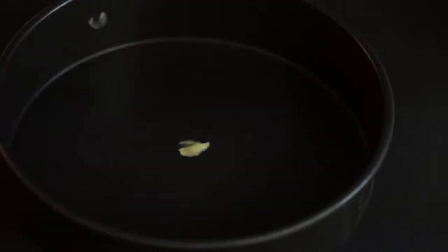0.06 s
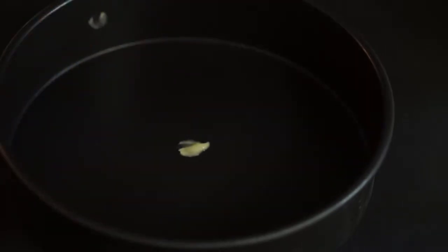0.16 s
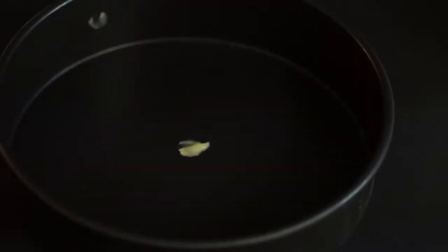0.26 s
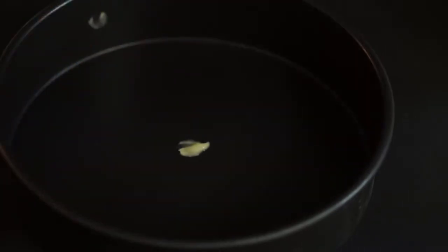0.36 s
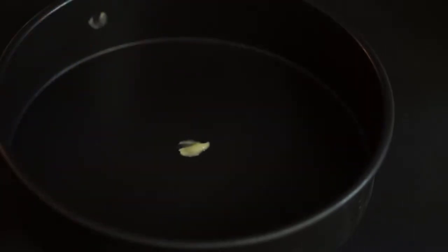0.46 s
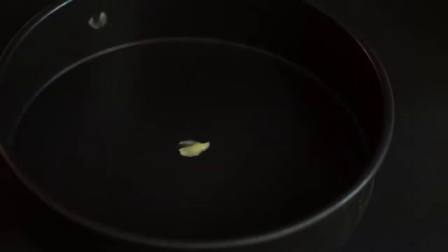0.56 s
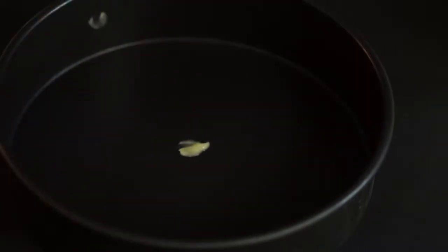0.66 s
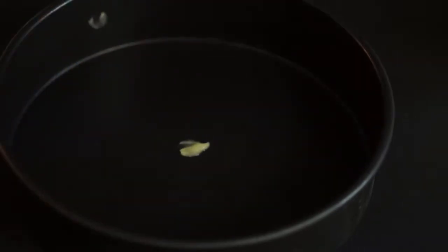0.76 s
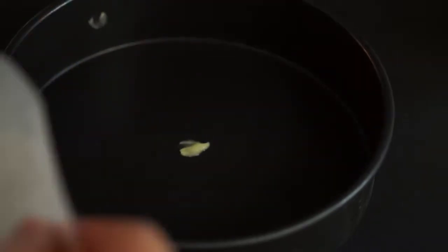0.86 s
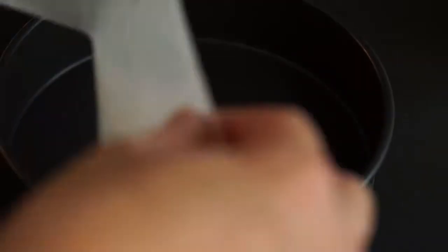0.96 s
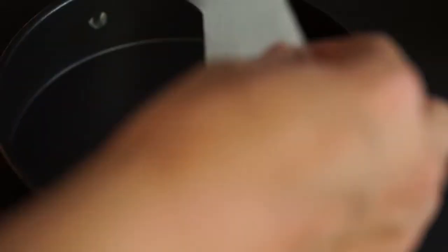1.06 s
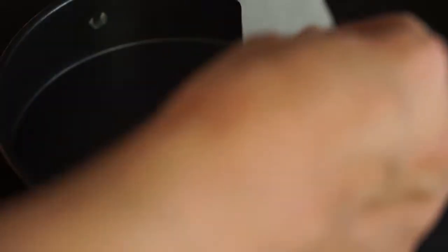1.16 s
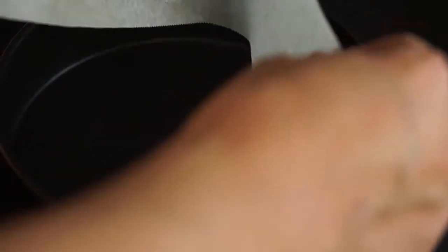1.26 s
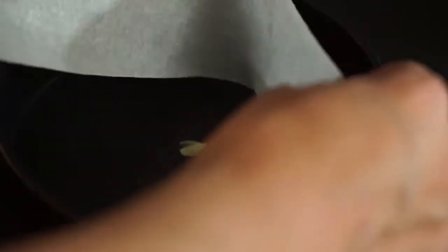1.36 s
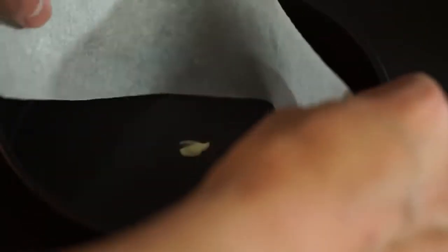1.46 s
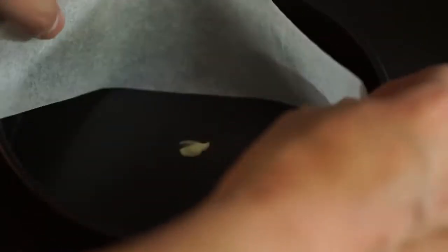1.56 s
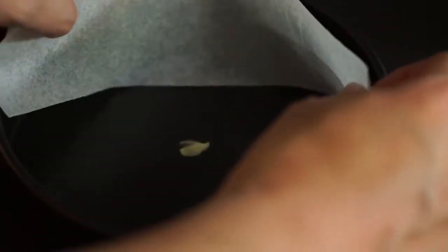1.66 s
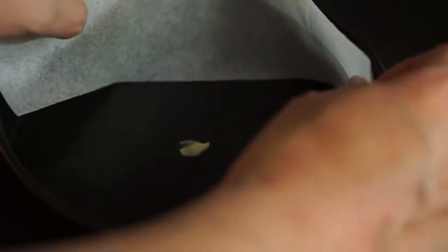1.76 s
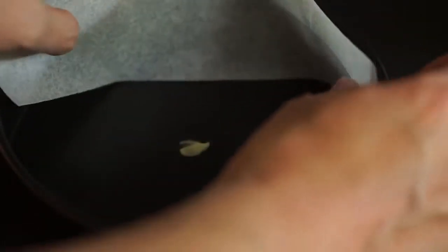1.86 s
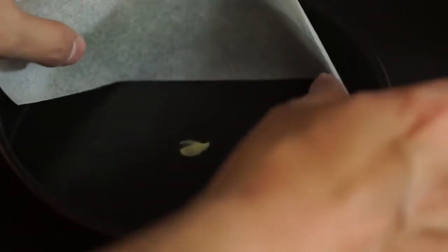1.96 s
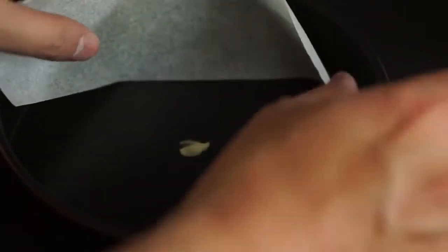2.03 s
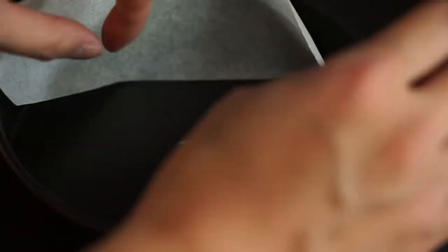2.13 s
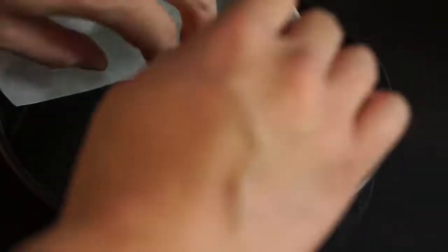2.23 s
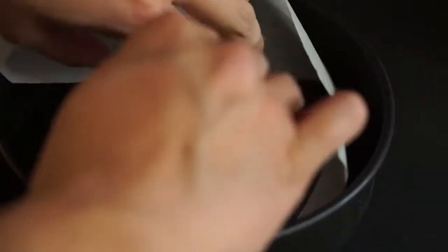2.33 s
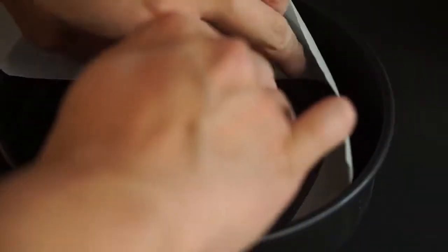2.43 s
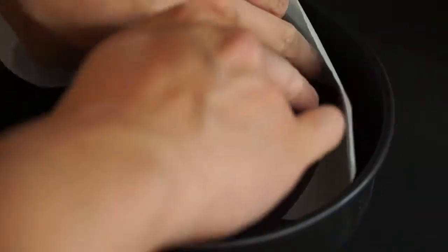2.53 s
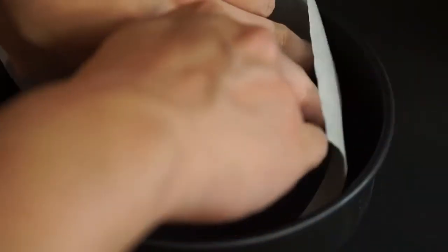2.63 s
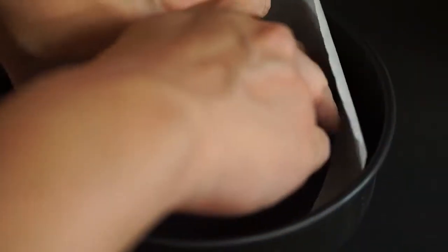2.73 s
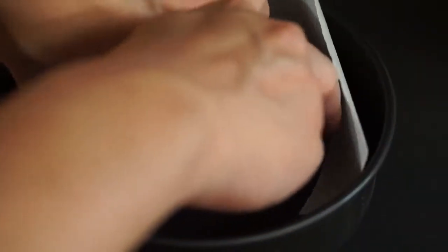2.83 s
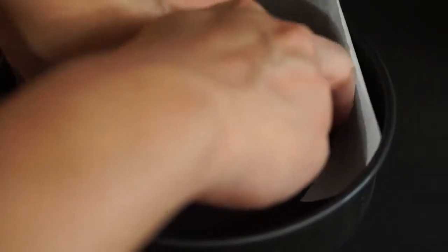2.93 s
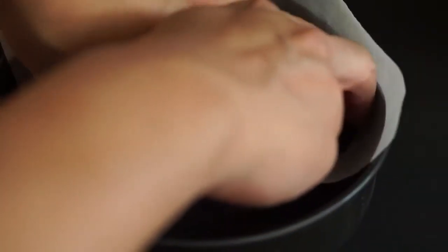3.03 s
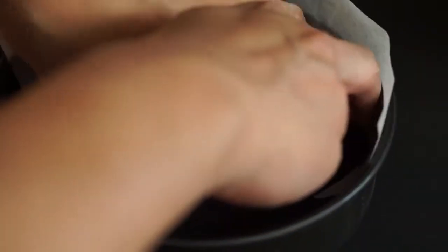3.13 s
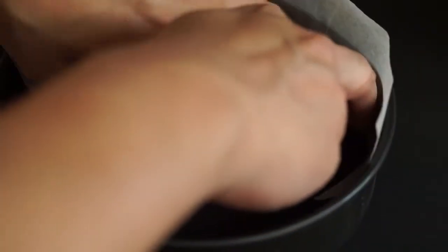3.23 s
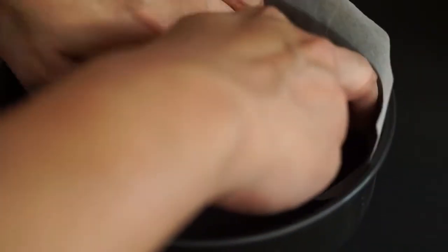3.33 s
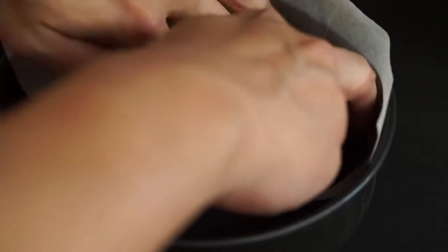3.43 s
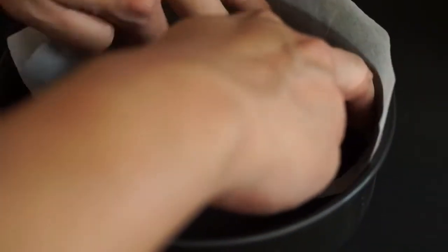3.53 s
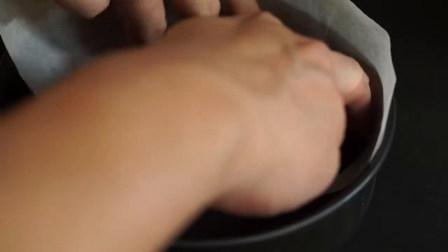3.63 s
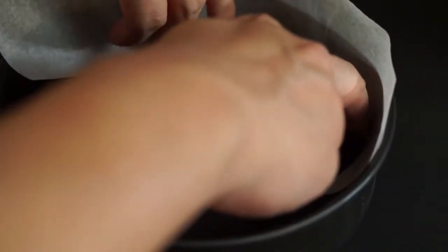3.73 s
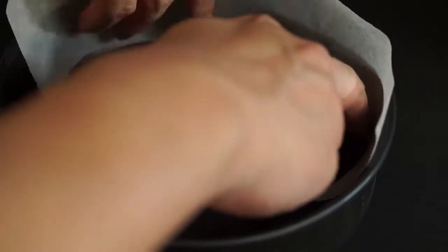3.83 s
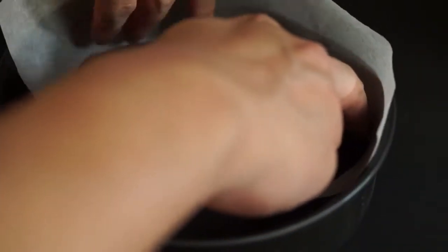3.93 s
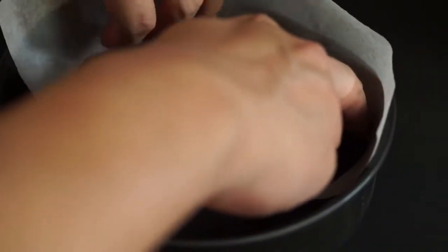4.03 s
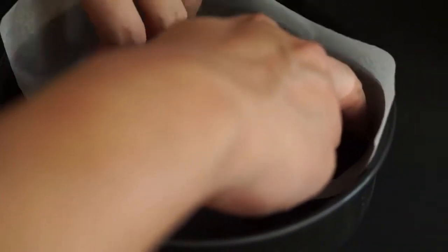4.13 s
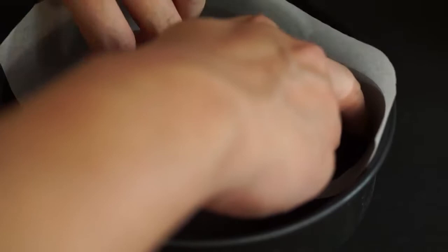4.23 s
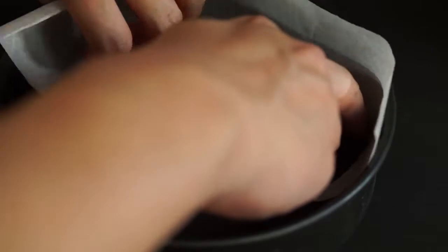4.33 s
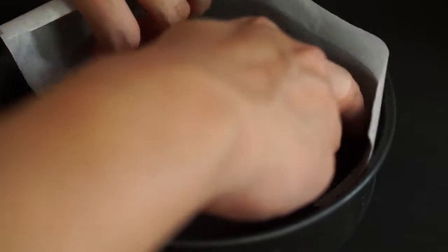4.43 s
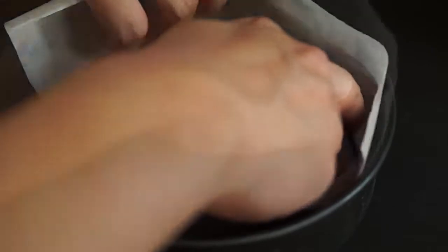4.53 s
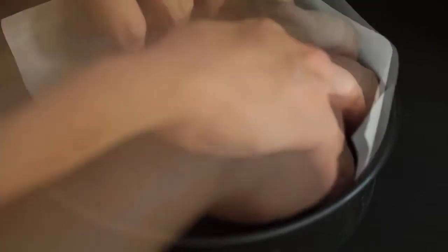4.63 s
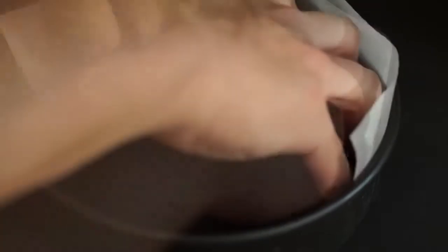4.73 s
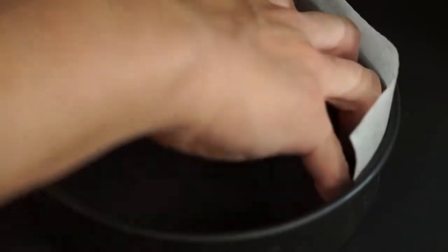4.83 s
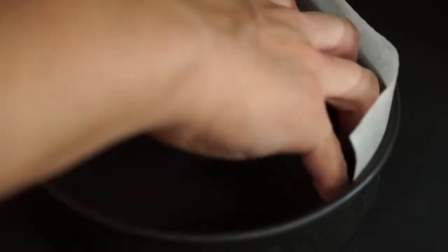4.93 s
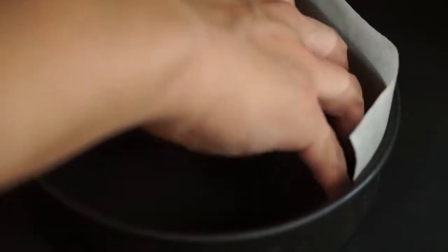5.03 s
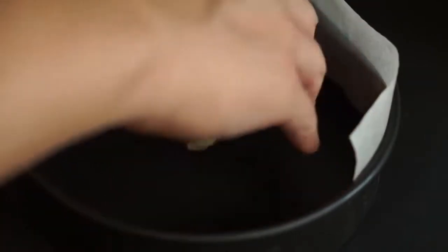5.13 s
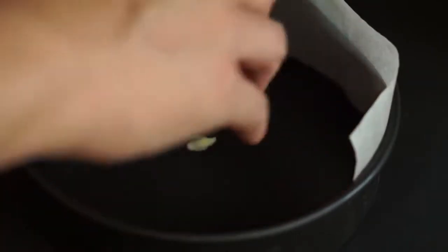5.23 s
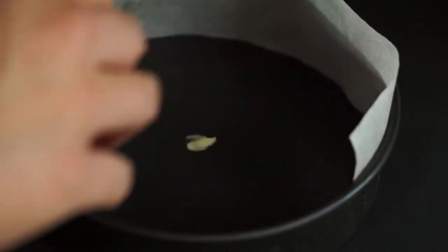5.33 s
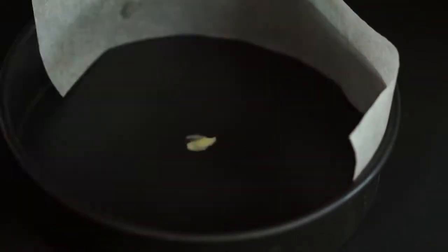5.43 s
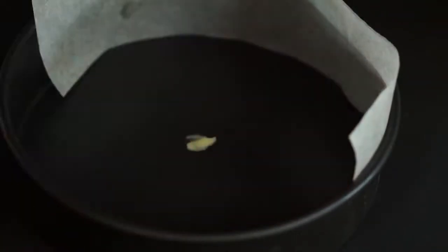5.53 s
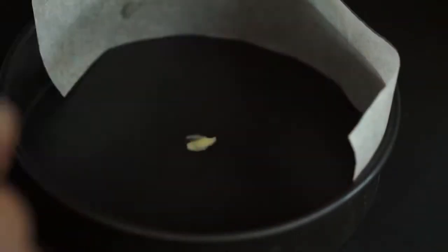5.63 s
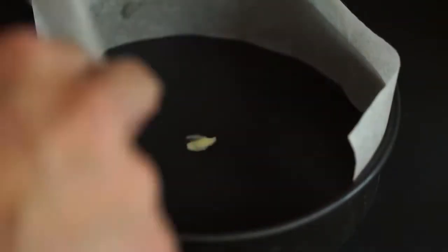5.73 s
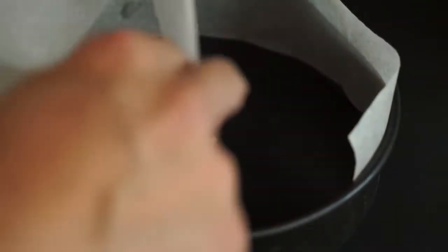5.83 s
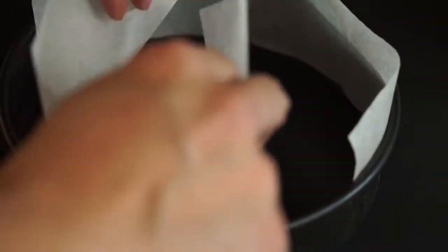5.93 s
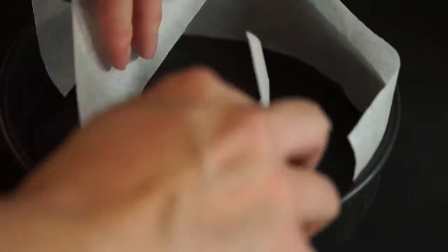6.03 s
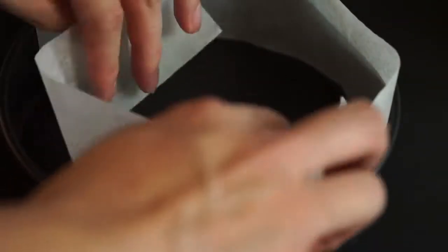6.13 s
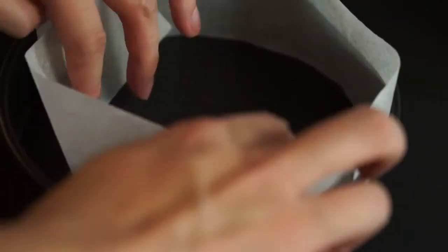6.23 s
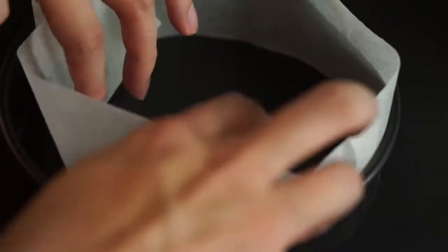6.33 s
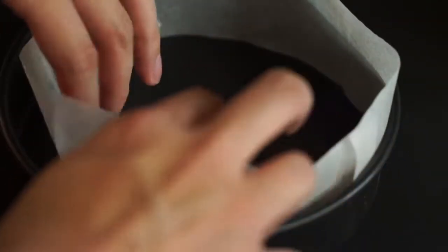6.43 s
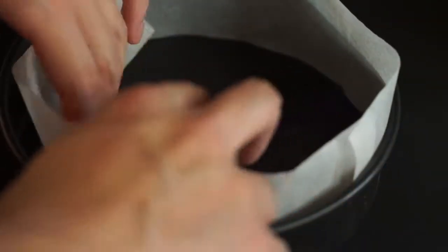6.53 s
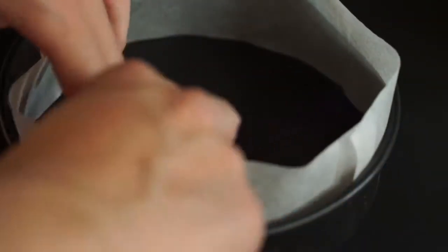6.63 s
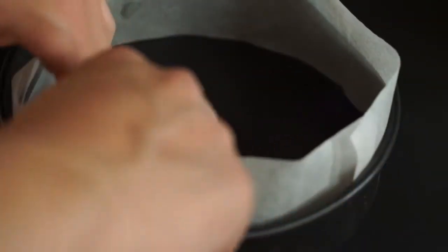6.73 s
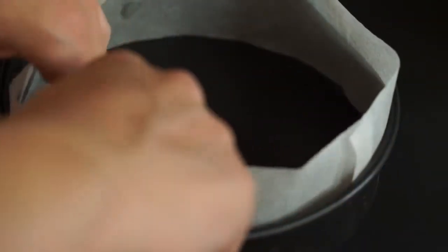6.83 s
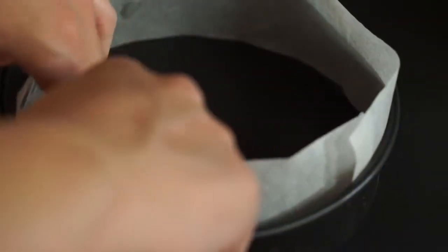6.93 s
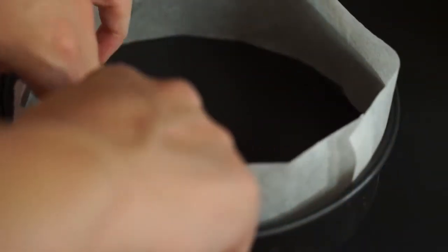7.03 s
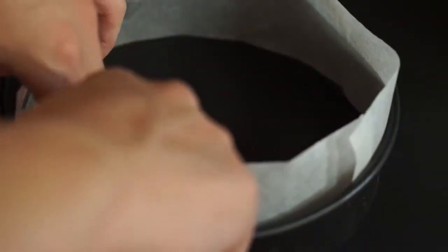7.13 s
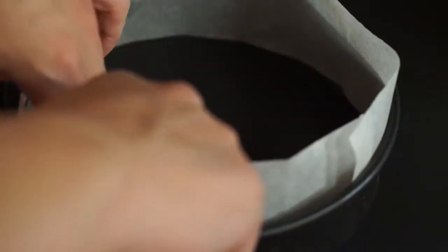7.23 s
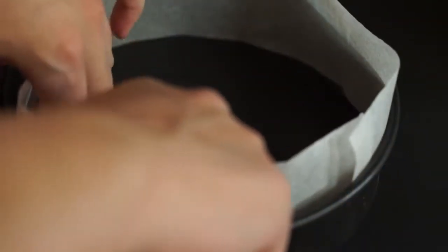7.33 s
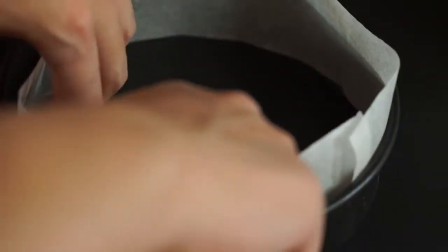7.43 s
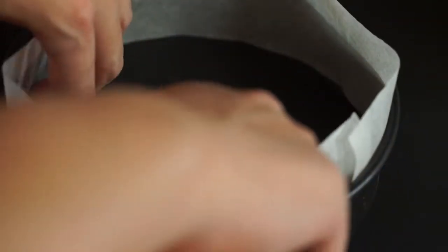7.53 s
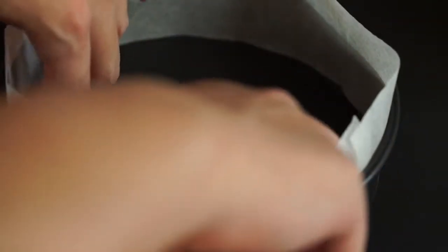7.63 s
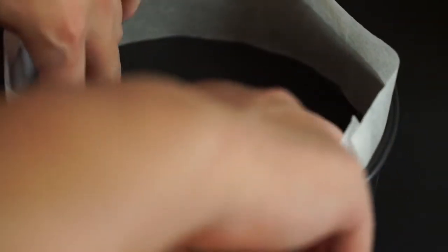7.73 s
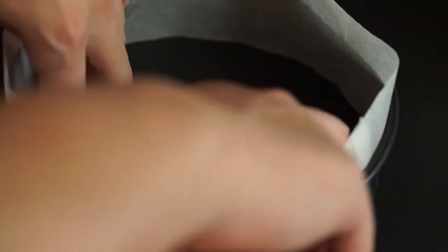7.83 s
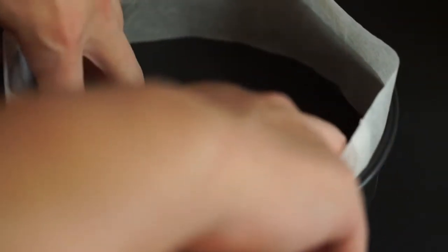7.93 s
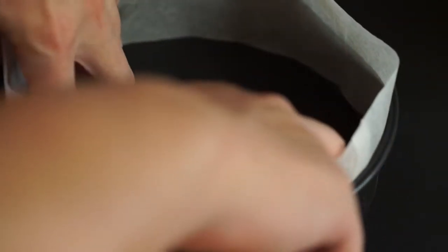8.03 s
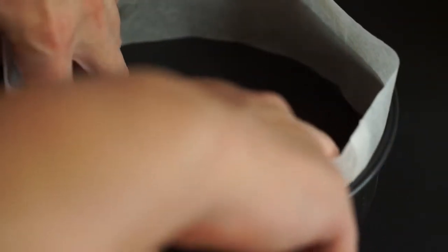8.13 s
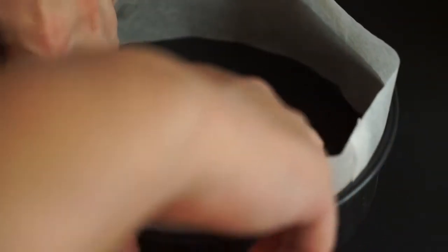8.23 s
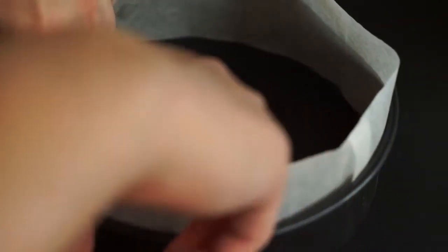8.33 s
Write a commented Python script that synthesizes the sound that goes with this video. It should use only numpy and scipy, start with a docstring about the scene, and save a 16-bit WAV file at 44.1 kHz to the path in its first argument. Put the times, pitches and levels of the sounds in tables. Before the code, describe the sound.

In a quiet kitchen with a faint low appliance hum, two hands fit strips of parchment into a metal pan. After nearly a second of stillness, paper snaps and rubs begin, pause briefly, then grow denser with soft finger thuds and hollow knocks. A second strip follows with sharp cracks, then gentler smoothing. One close microphone, short room tail.

```python
"""A kitchen with a humming appliance: two hands press two strips of baking parchment into a round metal pan.
Creases buckle in snaps, each an avalanche of clicks filtered by the sheet; sliding is a stick-slip rub of fibres.
Fingertips bump the pan with a sine thud and a band of noise, and decaying modes ring faintly in its wall.
Moving arms push low rumbling air over the one close microphone; a short noise tail gives the room."""
import sys
import numpy as np
from scipy import signal
from scipy.fft import rfft, irfft
from scipy.io import wavfile
from scipy.ndimage import uniform_filter1d

SR = 44100
rng = np.random.default_rng(int(sys.argv[2]) if len(sys.argv) > 2 else 0)


def store_pcm(level_fs):
    """Save levels as 16-bit WAV."""
    pcm = np.round(np.clip(level_fs, -1, 1) * 32767).astype(np.int16)
    wavfile.write(sys.argv[1], SR, np.atleast_2d(pcm).T)


N = 369558
TIME = np.arange(N) / SR


def undb(db):
    """Level law: decibels to amplitude gain."""
    return 10 ** (np.asarray(db) / 20)


def unit(x):
    """Normalisation of power: scale to rms 1."""
    return x / np.sqrt(np.mean(x ** 2))


def unit_energy(response):
    """Normalisation of energy: white noise of rms 1 keeps its level through such a response."""
    return response / np.linalg.norm(response)


def add(track, s, x):
    """Superposition: mix x into the track at time s, cut at the track's end."""
    i = int(s * SR)
    track[i:i + len(x)] += x[:max(N - i, 0)]


def through(x, response):
    """Linear filtering: convolve a sound with an impulse response."""
    return signal.fftconvolve(x, response)[:len(x)]


def butter(x, hz, kind, order=2):
    """Butterworth filtering: low-, high- or band-pass."""
    return signal.sosfilt(signal.butter(order, hz, kind, fs=SR, output="sos"), x)


def decay(t, t60):
    """Exponential damping: a fall of 60 dB in t60 seconds."""
    return np.exp(-np.log(1000) * t / t60)


def swelling(age):
    """Critically damped pulse: rises to 1 at age 1, then dies away."""
    return age * np.exp(1 - age)


def arch(middle_s, length_s):
    """Half-cosine window: a smooth rise to 1 and fall."""
    return np.cos(np.pi * np.clip((TIME - middle_s) / length_s, -.5, .5))


def colour(points, size=2048):
    """Minimum phase: the causal unit-energy response that has the given (Hz, dB) spectrum."""
    hz, db = np.transpose(points)
    bins = np.maximum(np.arange(size // 2 + 1) * SR / size, 1)
    log_gain = np.log(undb(np.interp(np.log(bins), np.log(hz), db)))
    # folding the cepstrum onto positive times makes the response causal
    cepstrum = irfft(log_gain)
    cepstrum[1:size // 2] *= 2
    cepstrum[size // 2 + 1:] = 0
    return unit_energy(irfft(np.exp(rfft(cepstrum))))


def walk(rate):
    """Smoothed random process: rms 1, changing about rate times a second."""
    k = max(int(SR / rate), 1)
    steps = np.repeat(rng.standard_normal(N // k + 1), k)
    return unit(uniform_filter1d(uniform_filter1d(steps, k), k)[:N])


# motor hum of the appliance: pitch_hz, level_db (rms), waver (0-1)
MOTOR_TONES = [(138.6, -56, 0.14), (168.4, -67.5, 0.77), (346, -73.5, 0.55)]
# spectrum of the quiet kitchen: frequency_hz, relative_level_db
KITCHEN_SPECTRUM = [(20, -14), (62, 4.5), (100, -3.5), (165, -2), (270, -7), (480, -17), (1600, -25),
                    (2100, -29.5), (4000, -30), (5500, -34.5), (15500, -35)]


def kitchen(noise_db=-58):
    """Modulated tones over stationary noise: a wavering motor hum with steady hiss and rumble."""
    hum = np.zeros(N)
    for hz, db, waver in MOTOR_TONES:
        # the complex factor wavers in both strength and phase
        modulation = 1 + waver * (walk(14) + 1j * walk(19))
        tone = np.real(modulation * np.exp(2j * np.pi * hz * TIME))
        hum += undb(db) * unit(tone)
    noise = through(rng.standard_normal(N), colour(KITCHEN_SPECTRUM, size=8192))
    return hum + undb(noise_db) * noise


# sweeps of an arm that push air over the microphone: middle_s, length_s, level_db (rms at the middle)
ARM_SWEEPS = [(2.12, 0.63, -52.5), (4.25, 0.22, -47), (4.442, 0.23, -42), (4.69, 0.25, -49.5)]


def draught(band_hz=(18, 48)):
    """Turbulence: slow eddies rumble on the microphone, swelling and fading with each sweep of an arm."""
    wind = sum(undb(db) * arch(s, length) for s, length, db in ARM_SWEEPS)
    return wind * unit(butter(rng.standard_normal(N), band_hz, "band"))


def room(x, wall_db=-14.0, t60_low=0.29, t60_high=0.39, split_hz=4500, onset_s=0.00099):
    """Reverberation: a short diffuse tail of decaying noise, whose treble fades more slowly."""
    t = TIME[:SR // 2]
    low, high = rng.standard_normal((2, len(t)))
    low_tail = butter(low, split_hz, "low") * decay(t, t60_low)
    high_tail = .5 * butter(high, split_hz, "high") * decay(t, t60_high)
    tail = (low_tail + high_tail) * (1 - np.exp(-t / onset_s))
    return undb(wall_db) * through(x, unit_energy(tail))


# modes of the pan wall: pitch_hz, relative_level_db, t60_s
PAN_MODES = [(959, 0, 0.16), (1577, -12.5, 0.29), (2134, 9.5, 0.03)]


def pan(x, ring_db=-55):
    """Modal resonance: the paper shakes the thin wall, whose modes the hands keep short."""
    t = TIME[:SR // 2]
    modes = sum(undb(db) * np.sin(2 * np.pi * hz * t) * decay(t, t60) for hz, db, t60 in PAN_MODES)
    return undb(ring_db) * through(x, modes)


# fingertips bumping the pan through the paper: start_s, thud_db, knock_db, knock_pitch_hz, time_to_peak_s
FINGER_BUMPS = [(2.716, -48, -43, 716, 0.0049), (2.925, -47, -46, 740, 0.0026),
                (3.043, -45.5, -57, 560, 0.0072), (3.322, -48, -47, 725, 0.0024),
                (3.367, -46, -41, 700, 0.0036), (3.627, -54, -43.5, 620, 0.0024),
                (3.688, -50.5, -53, 674, 0.0051), (4.434, -52, -48, 590, 0.0068),
                (6.634, -51.5, -44, 460, 0.0029), (7.072, -50.5, -65, 600, 0.011),
                (7.273, -55, -49.5, 465, 0.003), (7.843, -49, -58, 450, 0.0085)]


def bumps(thud_hz=230, knock_band=(.65, 1.45), rough=0.28):
    """Soft impact: the pan gives in a low thud, and the paper claps on the wall in a broad, hollow knock."""
    t = TIME[:8192]
    track = np.zeros(N)
    for s, thud_db, knock_db, hz, rise in FINGER_BUMPS:
        push = swelling(t / rise)
        low, high = rng.standard_normal((2, len(t)))
        thud = np.sin(2 * np.pi * thud_hz * t) + rough * unit(butter(low, 2 * thud_hz, "low"))
        knock = butter(high, hz * np.array(knock_band), "band", order=3)  # band edges as ratios of the pitch
        for db, tone in ((thud_db, thud), (knock_db, knock)):
            # each sound carries the energy of the push, scaled by its level
            add(track, s, undb(db) * np.linalg.norm(push) * unit_energy(push * tone))
    return track


def grains(rate):
    """Shot noise: tiny fibre clicks of random size, about rate a second; rms 1."""
    return unit((rng.random(N) < rate / SR) * rng.standard_normal(N))


def crackles(rate, range_db=16, crackle_s=.0011):
    """Random avalanche: loudness of small creases giving way, sudden and about a millisecond long; rms 1."""
    sizes = (rng.random(N) < rate / SR) * undb(-range_db * rng.random(N))
    fall = np.exp(-TIME[:1024] / crackle_s)
    power = through(sizes ** 2, fall ** 2)
    return unit(np.sqrt(np.abs(power)))


# spectrum of the parchment: frequency_hz, relative_level_db
PAPER_SPECTRUM = [(200, -4.5), (480, -1.5), (950, 1), (1300, -1), (1550, 3), (1800, -6), (2200, 4),
                  (2700, 3), (3400, 8.5), (4000, 3.5), (5200, -6), (7500, -12), (15500, -27.5)]


def registers(low_hz=1500, high_hz=6500, lowest_hz=300):
    """Band splitting: the sheet's response to a click as broad flap, crisp middle and fine fizz."""
    sheet = colour(PAPER_SPECTRUM)
    flap = butter(butter(sheet, low_hz, "low", order=4), lowest_hz, "high")
    crisp = butter(sheet, [low_hz, high_hz], "band", order=4)
    fizz = butter(sheet, high_hz, "high", order=4)
    return [unit_energy(part) for part in (flap, crisp, fizz)]


def facet(patchy_db, count=40):
    """Chance resonance: each facet of the creased sheet has its own random peaks and dips."""
    ripple_db = patchy_db * rng.uniform(-1, 1, count)
    return colour(np.c_[np.geomspace(400, 16000, count), ripple_db], size=256)


def flex(x, patchy_db=6, hop_s=.03):
    """Time-varying resonance: as the sheet bends, its peaks and dips change, crossfading at every hop."""
    hop = int(hop_s * SR)
    fade = np.hanning(2 * hop)
    track = np.zeros(N)
    for i in range(0, N - hop, hop):
        piece = x[i:i + 2 * hop]
        add(track, i / SR, np.convolve(piece * fade[:len(piece)], facet(patchy_db)))
    return track


# strokes of the fingers that slide the sheet: start_s, length_s, level_db (mid-stroke, before the band levels),
# growth_db (over the stroke), scrape_db (low scrape from pressing, relative, before its band level),
# flatness (how flat the sheet lies, 0-1)
FINGER_STROKES = [(0.828, 0.049, -56, 2, -7, 0.3), (1.007, 0.12, -58.5, -7, -1, 0),
                  (1.147, 0.27, -57.5, -11, -9, 0.8), (1.386, 0.27, -50.5, 11, -11.5, 0),
                  (1.674, 0.16, -50.5, -6, -9, 0.48), (1.862, 0.21, -70, 26, -19, 0.2),
                  (2.342, 0.073, -62, 7, -9, 0), (2.535, 0.11, -57, 15.5, -10, 0),
                  (2.683, 0.12, -46, 8, -8, 0.42), (2.828, 0.21, -54, 7.5, -7, 0.63),
                  (3.131, 0.26, -57, -1.5, -2, 0.7), (3.426, 0.13, -56.5, -17, -9, 1),
                  (3.565, 0.079, -51, 8.5, -6, 0.5), (3.708, 0.069, -53, 8, -8, 1),
                  (3.844, 0.092, -50, 10.5, -1, 0.45), (4.138, 0.16, -55, 1.5, -1, 0.14),
                  (4.367, 0.095, -46.5, 11, -0.5, 1), (4.466, 0.27, -52, -3, -3.5, 0.3),
                  (4.625, 0.049, -47, 5, -2, 0.37), (4.73, 0.096, -56, 14, -4, 0),
                  (5.53, 0.11, -57.5, 18, -7.5, 1), (5.604, 0.12, -49, -4, -7.5, 0.4),
                  (5.784, 0.078, -56, -1.5, -3.5, 0.23), (5.914, 0.28, -58, 12, -7, 0.7),
                  (6.138, 0.18, -43.5, -6, -9, 0.45), (6.477, 0.17, -52.5, 0.5, -12.5, 0.5),
                  (6.6, 0.09, -47, 5, -4, 0.4), (6.712, 0.07, -50, -1.5, 0.5, 0.48),
                  (6.803, 0.2, -47, -7, -2.5, 0.4), (7.01, 0.145, -52.5, 3, -4, 0.8),
                  (7.21, 0.13, -58.5, -4, -7, 1), (7.301, 0.15, -50.5, -2, -5, 0.95),
                  (7.514, 0.17, -49.5, 7, -1.5, 1), (7.693, 0.15, -55, -2, -6, 1),
                  (7.873, 0.22, -54, -8.5, -0.5, 0.8), (8.14, 0.22, -60.5, -6.5, 2.5, 0.6)]


def strokes(calm_db=-8.5, airy_db=4.5, attack_s=0.0084, release_s=0.04):
    """Force envelopes of rub, scrape, fizz and crackle: a sheet lying flat crackles less and hisses more."""
    powers = np.full((4, N), 1e-18)  # a tiny floor, so that ratios stay finite
    for s, length, db, growth_db, press_db, flat in FINGER_STROKES:
        t = TIME[:int((length + 8 * release_s) * SR)]
        attack = np.minimum(t / attack_s, 1)  # the fingers take hold
        hold = undb(db + growth_db * (np.minimum(t / length, 1) - .5))
        release = np.exp(-np.maximum(t - length, 0) / release_s)  # the sheet comes to rest
        for power, share_db in zip(powers, (0, press_db, airy_db * flat, calm_db * flat)):
            add(power, s, (undb(share_db) * attack * hold * release) ** 2)
    return np.sqrt(powers)


# times when a strip hangs free while it is lowered into the pan: middle_s, length_s
STRIP_LOWERINGS = [(1.585, 1), (5.966, 1)]


def rustle(scrape_db=-1, crisp_db=-2.0, fizz_db=-9.5, crackle_db=-0.1, rub_db=-3.0,
           swish_db=-3, swish_hz=(1600, 2450), hiss_db=-12, hiss_hz=(3900, 5400),
           air_db=-18.0, air_hz=(9500, 16000)):
    """Stick-slip friction: the sliding sheet gives a dense rub of fibres with small crackles over it."""
    force, scrape, fizz, creasing = strokes()
    crackling = undb(crackle_db) * creasing / force * crackles(rate=200)
    grip = np.hypot(undb(rub_db), crackling)
    # a strip that hangs free swishes in a lower band, otherwise it hisses in a higher one;
    # the finest fibres add an airy top to both
    free = sum(arch(s, length) for s, length in STRIP_LOWERINGS)
    click = signal.unit_impulse(1024)
    bands = [unit_energy(butter(click, hz, "band")) for hz in (swish_hz, hiss_hz, air_hz)]
    drives = (scrape * undb(scrape_db), force * undb(crisp_db), fizz * undb(fizz_db),
              force * free * undb(swish_db), fizz * (1 - free) * undb(hiss_db), fizz * undb(air_db))
    track = np.zeros(N)
    for drive, response in zip(drives, registers() + bands):
        track += through(grip * drive * grains(rate=10000), response)
    return track


# the loudest creases that buckle: start_s, level_db (crisp middle), flap_db (low flap, relative, before its trim),
# fizz_db (top fizz, relative), time_to_peak_s
CREASE_SNAPS = [(0.828, -39.5, -9, -8.5, 0.0023), (0.885, -43, -7.5, -6.5, 0.0032),
                (0.941, -45.5, -1.5, -14, 0.0023), (0.950, -37, -11, -9.5, 0.0018),
                (0.997, -40, 0.5, -18, 0.0021), (1.011, -41.5, -5, -7.5, 0.003),
                (1.088, -41.5, -23, -13.5, 0.0035), (1.131, -45, -10, -21, 0.0019),
                (1.246, -42.5, -8, -12, 0.0015), (1.311, -46.5, -7.5, -15, 0.0062),
                (1.399, -39.5, -8, -2.5, 0.00088), (1.427, -41.5, -12, -7, 0.0018),
                (1.451, -47, -14, -4, 0.0018), (1.51, -49, -8, -2, 0.0041), (1.539, -40.5, -11, -20, .0025),
                (1.556, -38.5, -9, -10, 0.0011), (1.58, -45, -14, 0, 0.0014),
                (1.623, -48, -15, -16, 0.0022), (1.636, -42.5, -15, -6, .0024),
                (1.652, -40, -11, -6, 0.0033), (1.768, -44.5, -18, -9, .0018),
                (1.825, -43, -20, -10, 0.0012), (1.842, -42.5, -22, -4, 0.0025),
                (1.876, -33.5, -16, -5, 0.0031), (2.383, -48, -12, -3, 0.0061),
                (2.48, -45.5, -16, -34, 0.0011), (2.635, -35, -16.5, -10, 0.0033),
                (2.7, -33, -9, -16, 0.0045), (2.71, -34.5, -16, -10.5, 0.0071),
                (2.73, -33.5, -22, -12, 0.0015), (2.804, -40.5, -10, -2, 0.003),
                (2.881, -37.5, -10, -6, 0.0018), (3.022, -41.5, -6, -4.5, 0.0035),
                (3.040, -35, -1, -8.5, 0.0015), (3.161, -37.5, -1, -4, 0.0025),
                (3.761, -40.5, -28, 1.5, 0.0048), (3.852, -39.5, -9, -10, 0.0046),
                (3.916, -40, -1, -6.5, 0.0044), (3.939, -38.5, -1, -7.5, 0.004),
                (4.024, -47.5, -5, -9, 0.0019), (4.189, -38, -3.5, -12, 0.0037),
                (4.223, -38.5, -10, -16.5, 0.0015), (4.251, -37.5, -6, -4.5, 0.0047),
                (4.354, -40.5, -4.5, -6.5, 0.0037), (4.393, -36.5, -28, -8, 0.0032),
                (4.411, -28.5, -14, -5, 0.0012), (4.435, -31.5, -17, -8.5, 0.0038),
                (4.649, -32.5, -7.5, -9, 0.0025), (4.678, -34.5, -8, -3, 0.0022),
                (4.688, -38.5, -12, 0, 0.0011), (4.731, -38.5, -22, -16, 0.0011),
                (4.846, -46.5, -19, 1, 0.0018), (4.955, -43.5, -3.5, -13, 0.0012),
                (5.006, -33, -19, -9.5, 0.0012), (5.043, -38, -2, -14, 0.00094),
                (5.061, -30.5, -6, -9.5, 0.0018), (5.622, -38.5, -7, 2.5, 0.0028),
                (5.694, -46, -4, 5, 0.002), (5.73, -42.5, -26, -6, 0.002),
                (5.767, -44.5, -8, -10.5, 0.0038), (5.958, -46, -9.5, -13, 0.0057),
                (6.073, -45.5, -3.5, -1.5, 0.0034), (6.159, -21, -18.5, -4.5, 0.0025),
                (6.221, -35, -24, -7, 0.0013), (6.250, -35.5, -15, -10, 0.007),
                (6.272, -34.5, -11, 3.5, 0.003), (6.287, -31, -13, -10, 0.0041),
                (6.612, -39.5, -21, -16, 0.0046), (6.653, -39.5, -13, -25, 0.0025),
                (6.678, -37, -8.5, -2.5, 0.0041), (6.732, -42, -12, -12, 0.0029),
                (6.879, -41.5, -17, -0.5, 0.0016), (6.952, -24, -14.5, -3, 0.0023),
                (6.99, -36, -22, -5, 0.0021), (7.021, -50, -14, 4, 0.0014), (7.129, -45, -5.5, -24, 0.0026),
                (7.141, -43, -3, -5, 0.0023), (7.455, -40.5, -4.5, -20, 0.0022),
                (7.55, -45, -0.5, -7, 0.0022), (7.647, -39, -15, -5, 0.0042),
                (8.013, -43.5, -13, -8, 0.0027), (8.214, -51, -8, -2, 0.0026),
                (8.256, -35.5, -4.5, -12.5, 0.0024), (8.318, -49.5, -16, -13, 0.0018)]


def snaps(flap_trim_db=-1, patchy_db=4.0, settle_db=-25, settle_s=.02, jerk_db=-1):
    """Buckling: an avalanche of clicks, returned as aimed by its facet and as spread evenly round the room."""
    size = int(.09 * SR)
    t = TIME[:size]
    # the crease gives way in jerks, felt in every register
    jerks = np.hypot(1, undb(jerk_db) * crackles(rate=900))
    clicks = [jerks * grains(rate=14000) for _ in range(3)]
    parts = registers()
    aimed, spread = np.zeros((2, N))
    for s, db, flap_db, fizz_db, rise in CREASE_SNAPS:
        age = t / rise
        settling = undb(settle_db) * (1 - np.exp(-age)) * np.exp(-t / settle_s)
        swell = swelling(age) + settling
        ring = facet(patchy_db)
        start = rng.integers(N - size)  # a random stretch of clicks for each snap
        for part, source, share_db in zip(parts, clicks, (flap_db + flap_trim_db, 0, fizz_db)):
            even = through(swell * source[start:start + size], part)
            gain = undb(db + share_db) * np.linalg.norm(swell)
            add(aimed, s, gain * unit_energy(through(even, ring)))
            add(spread, s, gain * unit_energy(even))
    return aimed, spread


def scene():
    """Superposition at one microphone: direct paper, pan ring, room and background, alike in both channels."""
    background = kitchen() + draught()
    aimed, spread = snaps()
    handling = flex(rustle()) + bumps()
    wall = pan(spread + handling)
    mono = aimed + handling + wall + room(spread + handling + wall) + background
    return np.array([mono, mono])


def record(dry, top_hz=15750):
    """Band limiting: the recorder cuts the top with a steep elliptic low-pass."""
    return signal.sosfilt(signal.ellip(10, .2, 70, top_hz, fs=SR, output="sos"), dry)


dry = scene()
out = record(dry)
store_pcm(out)
```